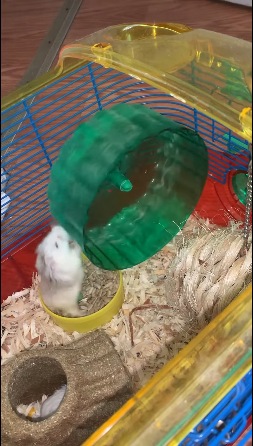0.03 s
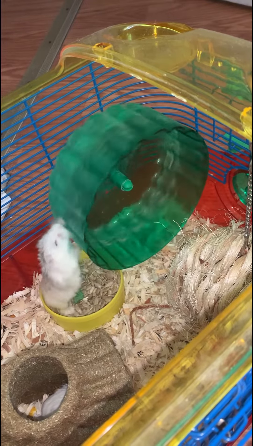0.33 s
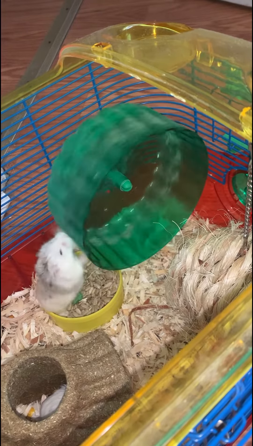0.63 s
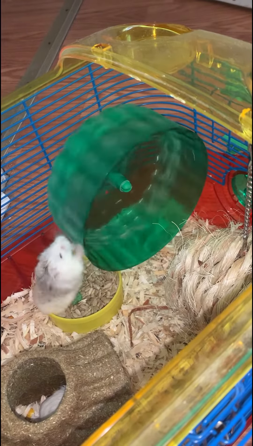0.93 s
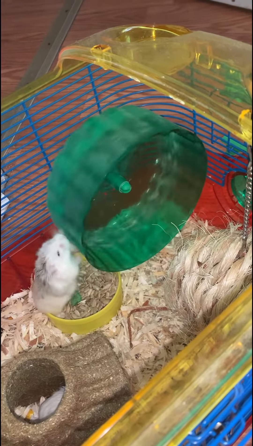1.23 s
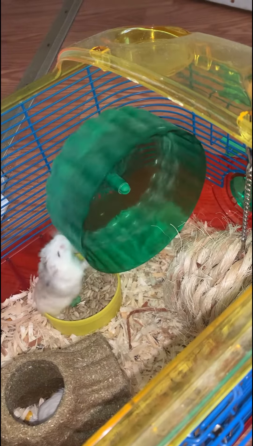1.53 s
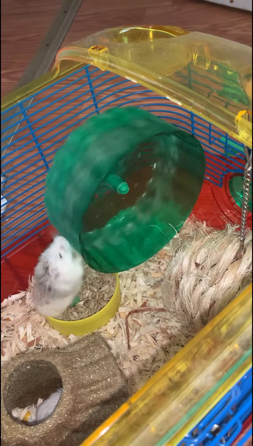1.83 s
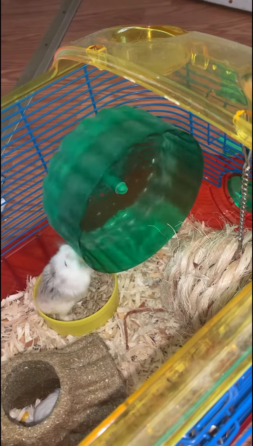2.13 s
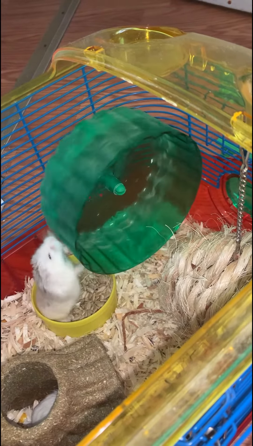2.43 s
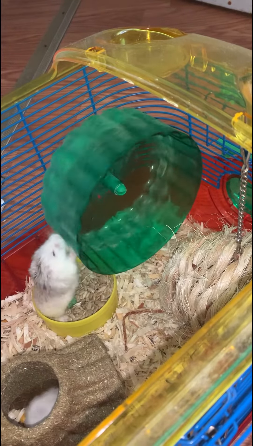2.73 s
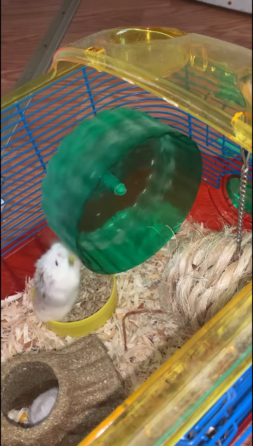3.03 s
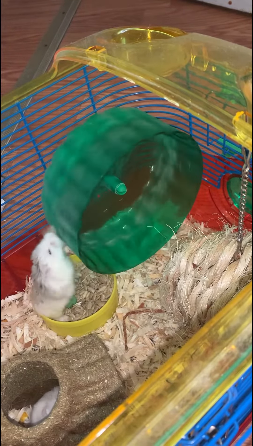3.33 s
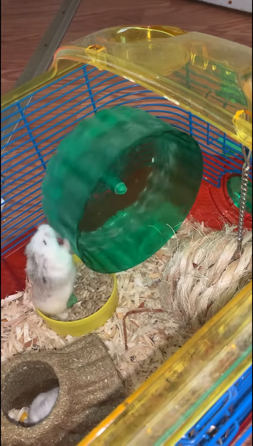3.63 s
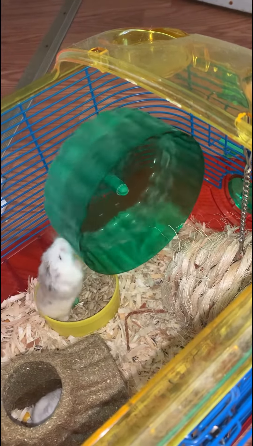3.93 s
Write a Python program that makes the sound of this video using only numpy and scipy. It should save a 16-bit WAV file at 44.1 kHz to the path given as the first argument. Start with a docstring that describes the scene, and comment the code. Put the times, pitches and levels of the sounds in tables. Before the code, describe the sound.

A spinning plastic hamster wheel rattles and scrapes unevenly on its axle, heard close.

```python
"""Empty hamster wheel

A plastic wheel spins and wobbles on its axle in a small wire cage, heard from just above.
Its hub sticks and slips in short, gritty scrapes that make the shell ring brightly.
Slower rubs bring out the lower tones of the drum, and the off-centre wheel sways the cage.
A few soft knocks and a rustle come from the cage, over the room's low rumble and mains hum."""
import sys
import numpy as np
from scipy import signal
from scipy.fft import rfft, irfft
from scipy.io import wavfile
from scipy.ndimage import uniform_filter1d, map_coordinates

SR = 44100
rng = np.random.default_rng(int(sys.argv[2]) if len(sys.argv) > 2 else 0)


def transcribe(signal):
    """Save signal, clipped to [-1, 1], as a 16-bit WAV file at the path in sys.argv[1]."""
    frames = np.atleast_2d(signal).T
    limited = np.clip(frames, -1, 1)
    pcm = np.round(limited * 32767).astype(np.int16)
    wavfile.write(sys.argv[1], SR, pcm)


N = 176400
T, HZ = np.arange(N) / SR, np.arange(N + 1) * SR / (2 * N)
TOP_HZ = 15850  # where the treble ends
GRIT_HZ, GRIT_DB = 400, 1.5  # how fast and how much the friction flickers


def gain(db):
    """Turn decibels into a multiplier."""
    return 10 ** (np.asarray(db) / 20)


def unit(x):
    """Scale to an average power of 1."""
    return x / np.sqrt(np.mean(np.abs(x) ** 2))


def colour(points):
    """Join (f/Hz, level/dB) points into a gain for every frequency."""
    hz, db = np.array(points).T
    return gain(np.interp(np.log(HZ + 1), np.log(hz), db))


def filtered(x, response):
    """Shape a sound with a gain for every frequency."""
    return irfft(rfft(x, 2 * N) * response)[..., :N]


def ringing_body(broad, tones):
    """The response of an object: a broad colour plus a peak for each tone it rings at."""
    power = broad ** 2
    for hz, width, db in tones:
        peak = gain(db) ** 2 / (1 + ((HZ - hz) / (width / 2)) ** 2)
        power += peak / (1 + ((HZ - hz) / (4 * width)) ** 2)  # trim the peak's sides
    cepstrum = irfft(np.log(power) / 2)
    one_sided = np.r_[1, np.full(N - 1, 2), np.zeros(N)]  # ring after a touch, never before
    return unit(np.exp(rfft(cepstrum * one_sided)))


def dull_peak(hz):
    """The response of something that barely rings: one wide peak."""
    return unit(1 / (1 + (2 * (HZ / hz - 1)) ** 2))


def wander(rate_hz):
    """A smooth random wobble with a typical size of 1."""
    steps = rng.standard_normal(N // 20)
    hz = np.arange(len(steps) // 2 + 1) / T[-1]
    smooth = irfft(rfft(steps) * np.exp(-(hz / rate_hz) ** 2), len(steps))
    return unit(np.interp(T, T[::20], smooth))


def swell(at, length_s):
    """A push that peaks at a given time and stays above half strength for length_s."""
    push, near = np.zeros(N), np.abs(T - at) < 10 * length_s
    halving_s = length_s * np.where(T[near] < at, .48, .52)  # rise, fall
    push[near] = .5 ** (np.abs((T[near] - at) / halving_s) ** 1.15)
    return push


def slips(per_second=12000, scatter_db=2.5):
    """Surfaces catch and let go, making a stream of tiny, uneven clicks."""
    clicks = rng.random(N) < per_second / SR
    size = gain(scatter_db * np.clip(rng.standard_normal(N), -2, 2))
    return unit(clicks * size * rng.choice([-1, 1], N))


def in_cage(drive, response, echo_db=0, fade_s=.045):
    """Sound reaches the left ear first; a short wash of cage echoes follows, different in each ear."""
    # how far the left ear is ahead: f/Hz, phase/rad
    left_lead = [(1500, 0), (3500, 1), (4400, 3.1), (16700, 20.9)]
    phase = np.interp(HZ, *np.array(left_lead).T) * np.array([[.5], [-.5]])
    decay = gain(-60 * T / fade_s) ** 2
    echo_power = np.abs(signal.fftconvolve(drive ** 2, decay / decay.sum())[:N])
    echoes = rng.standard_normal((2, N)) * np.sqrt(echo_power) * gain(echo_db)
    return filtered(drive, response * np.exp(1j * phase)) + filtered(echoes, response)


def room(rumble_db=-55, waver_db=2):
    """A low rumble and a wavering mains hum fill the room."""
    # colour of the rumble: f/Hz, relative level/dB
    rumble_colour = [(30, -26), (52, 8.5), (68, 2), (150, 0), (178, -8), (230, 0), (280, -9.5), (355, -8.5),
                     (470, -17.5), (650, -29), (1200, -34.5), (16000, -54)]
    # tones of the hum: f/Hz, level/dB
    hum_tones = [(58, -61.5), (100, -64), (120, -56.5), (201, -68), (223, -70.5)]
    mid, side = filtered(rng.standard_normal((2, N)), unit(colour(rumble_colour)))
    side = filtered(side, np.minimum(HZ / 700, 1))  # both ears hear nearly the same bass
    hum = 0
    for hz, db in hum_tones:
        strength = np.sqrt(2) * gain(db + waver_db * wander(9.5))
        hum += strength * np.sin(2 * np.pi * hz * T + .7 * wander(1.22))
    return gain(rumble_db) * (mid + side * np.array([[1], [-1]])) + hum


def cage_bumps(hz=54):
    """The off-centre wheel sways the cage on its base in soft, low bumps."""
    # sways of the cage: t/s, level/dB
    bumps = [(.41, -53), (1.03, -55), (2.28, -82), (3.47, -49)]
    sound = 0
    for at, db in bumps:
        tone = np.sqrt(2) * np.sin(2 * np.pi * (hz * T + rng.random()))
        sound += gain(db) * swell(at, length_s=.082) * tone
    return sound


def cage_rustle():
    """Tiny slips make a dull, grainy rustle, perhaps of the bedding."""
    # rustles in the cage: t/s, level/dB, length/s
    rustles = [(2.67, -74, 0.21), (2.806, -68, .03), (2.861, -70.5, 0.06)]
    strength = sum(gain(db) * swell(at, length) for at, db, length in rustles)
    return in_cage(slips() * strength * np.abs(wander(GRIT_HZ)), dull_peak(hz=1100))


def cage_knocks():
    """Soft knocks die away quickly, each around its own pitch."""
    # knocks and ticks: t/s, level/dB, f/Hz, time to fade by 60 dB/s
    knocks = [(0.166, -56.5, 1200, 0.026), (0.193, -48, 3000, 0.03), (0.924, -64, 1170, 0.061),
              (2.790, -55.5, 1200, 0.02), (2.793, -55, 780, .04), (3.909, -69.5, 930, 0.14)]
    sound = 0
    for at, db, hz, fade_s in knocks:
        strength = (T >= at) * gain(db - 60 * np.abs(T - at) / fade_s)
        sound += in_cage(rng.standard_normal(N) * strength, dull_peak(hz))
    return sound


def hub_pressure(scrape_trim_db=-1, snap_decay_s=.004):
    """How hard the hub bears on the axle: short scrapes and sudden snaps."""
    # scrapes of the hub: t/s, relative level/dB
    scrapes = [(0.002, -39.5), (0.027, -50), (0.07, -43.5), (0.098, -39.5), (0.124, -43.5), (0.153, -40.5),
               (0.183, -41), (0.196, -43.5), (0.217, -35.5), (0.234, -46), (0.254, -50.5), (0.272, -46),
               (0.296, -42.0), (0.337, -38.5), (0.364, -42), (0.38, -45.5), (0.398, -42), (0.428, -40),
               (0.462, -35.0), (0.484, -49), (0.5, -40), (0.512, -44.5), (0.526, -41.0), (0.589, -42),
               (0.61, -48), (0.631, -46.0), (0.652, -43.5), (0.685, -50), (0.695, -41), (0.716, -54),
               (0.735, -42.5), (0.761, -42.5), (0.797, -39), (0.844, -43), (0.868, -45.5), (0.909, -43),
               (0.932, -47), (0.955, -46), (0.977, -44.5), (1.038, -41.5), (1.092, -43.5), (1.117, -34),
               (1.137, -38), (1.203, -46), (1.238, -42), (1.258, -47), (1.323, -48.0), (1.371, -47),
               (1.39, -50), (1.412, -51), (1.429, -46), (1.456, -40.5), (1.482, -43), (1.516, -40),
               (1.524, -38), (1.544, -42.5), (1.573, -40.5), (1.6, -36.5), (1.632, -40), (1.653, -40.5),
               (1.668, -45.5), (1.697, -40.5), (1.711, -42), (1.796, -42.5), (1.831, -53.5), (1.889, -48.5),
               (1.909, -40.5), (1.927, -40.5), (1.944, -49.5), (1.977, -39.5), (2.018, -53.0),
               (2.037, -48.5), (2.049, -42), (2.067, -51), (2.127, -49.5), (2.2, -42), (2.236, -44),
               (2.294, -46.5), (2.318, -51.5), (2.412, -51), (2.44, -48.5), (2.482, -38.5), (2.514, -43),
               (2.531, -43), (2.551, -45), (2.591, -41.5), (2.624, -53.0), (2.649, -48.5), (2.665, -44.5),
               (2.687, -41), (2.708, -38), (2.729, -52), (2.755, -48.5), (2.775, -41.5), (2.809, -35),
               (2.838, -47), (2.86, -38.5), (2.886, -40.5), (2.926, -41.5), (2.954, -55), (2.972, -45),
               (2.992, -43.5), (3.028, -40.5), (3.06, -53.5), (3.098, -41.5), (3.115, -47.5),
               (3.145, -42.0), (3.165, -52.0), (3.185, -45), (3.203, -43), (3.214, -40.5), (3.243, -53),
               (3.253, -41.5), (3.277, -50), (3.303, -39), (3.322, -43), (3.341, -42), (3.366, -40),
               (3.392, -52), (3.442, -45.0), (3.478, -46.5), (3.49, -40.5), (3.548, -47.5), (3.589, -48),
               (3.602, -43.5), (3.62, -52), (3.64, -42), (3.663, -40.5), (3.714, -46), (3.731, -52),
               (3.759, -44.5), (3.771, -45.5), (3.807, -41.0), (3.858, -47.5), (3.883, -45), (3.907, -48),
               (3.922, -42.0), (3.948, -42), (3.98, -60)]
    # sharp snaps of the hub: t/s, level/dB
    snaps = [(.144, -38.5), (.321, -40.5), (1.772, -42), (1.817, -42), (1.863, -43), (2.157, -41),
             (2.194, -44), (2.277, -46), (2.377, -42)]
    power = sum((gain(db + scrape_trim_db) * swell(at, length_s=.007)) ** 2 for at, db in scrapes)
    for at, db in snaps:
        power += ((T >= at) * gain(db) * np.exp(-np.abs(T - at) / snap_decay_s)) ** 2
    return np.sqrt(power)


def moving_contact(x, top_hz, rate_hz, depth_db, bands):
    """The contact point moves round the wheel, so each touch favours different tones."""
    centres, step = np.linspace(0, top_hz, bands, retstep=True)
    weights = gain(depth_db * np.array([wander(rate_hz) for _ in centres]))
    weights /= np.sqrt(np.mean(weights ** 2, axis=0))  # keep the overall strength steady
    return sum(filtered(x, np.maximum(1 - np.abs(HZ - hz) / step, 0)) * weight
               for hz, weight in zip(centres, weights))


def drum_echo(x, strength=.5):
    """Sound bounces inside the wobbling drum; its changing path colours each scrape differently."""
    delay_s = .0016 + .00005 * wander(9)
    echo = map_coordinates(x, [(T - delay_s) * SR])
    return (x + strength * echo) / np.hypot(1, strength)


def drum_rubs(pressure, scrape_share_db=-20, grind_db=-71):
    """The drum grinds while the hub presses; slow rubs and a share of each scrape ring it too."""
    # rubs of the wobbling drum: t/s, level/dB
    rubs = [(.195, -68), (.517, -59.5), (.637, -64), (0.972, -59.5), (1.057, -63.5), (1.54, -59.5),
            (1.64, -60), (2.87, -63), (3.212, -62), (3.305, -61)]
    # broad colour of the drum: f/Hz, relative level/dB
    drum_colour = [(300, -22), (750, -22), (1400, -19.5), (2400, -10), (3700, -14), (5000, -44.5),
                   (16000, -64)]
    # tones the drum rings at: f/Hz, width/Hz, relative level/dB
    drum_tones = [(1826, 64, -3.5), (2048, 24, -5), (2212, 28.3, 2.5), (2438, 23.6, 4), (2650, 170, -19),
                  (2920, 18.5, 2)]
    load = np.abs(uniform_filter1d(pressure, int(.038 * SR)))  # smoothed pressure
    power = sum((gain(db) * swell(at, length_s=.025)) ** 2 for at, db in rubs)
    power += (pressure * gain(scrape_share_db)) ** 2
    power += gain(grind_db) ** 2 * load / load.mean()
    friction = slips() * np.sqrt(power) * gain(GRIT_DB * wander(GRIT_HZ))
    friction = moving_contact(friction, top_hz=4330, rate_hz=24, depth_db=3.5, bands=22)
    return in_cage(friction, ringing_body(colour(drum_colour), drum_tones))


def hub_scrapes(pressure, rolling_db=-74, tone_width_hz=70):
    """The hub sticks and slips on the axle, ringing the bright tones of the plastic shell."""
    # broad colour of a scrape: f/Hz, relative level/dB
    shell_colour = [(500, -22), (1500, -50.5), (3600, -33.5), (4600, -21), (5800, -13.5), (7300, -26.5),
                    (8000, -15), (9000, -5), (11400, -7), (13000, -6.5), (14700, -4), (16000, -6.5)]
    # tones the shell rings at: f/Hz, relative level/dB
    shell_tones = [(4160, -4), (5270, -4), (5490, -10), (6560, -8), (6880, -8.5), (7540, -4), (9640, -3),
                   (10200, 1.5), (10570, -1)]
    broad = colour(shell_colour) / (1 + (HZ / TOP_HZ) ** 20)
    shell = ringing_body(broad, [(hz, tone_width_hz, db) for hz, db in shell_tones])
    friction = slips() * (pressure + gain(rolling_db)) * gain(GRIT_DB * wander(GRIT_HZ))
    friction = moving_contact(drum_echo(friction), TOP_HZ, rate_hz=28, depth_db=3, bands=24)
    return in_cage(friction, shell, echo_db=-8)


def scene():
    """Wheel, cage and room together; the same pressure drives both hub and drum."""
    pressure = hub_pressure()
    lean_right = gain([[-1.75], [1.75]])
    wheel = hub_scrapes(pressure) + drum_rubs(pressure) * lean_right
    return wheel + cage_knocks() + cage_rustle() + cage_bumps() + room()


def record(dry):
    """Cut off the highest treble steeply."""
    return signal.sosfilt(signal.ellip(12, .1, 80, TOP_HZ, fs=SR, output="sos"), dry)


dry = scene()
out = record(dry)
transcribe(out)
```